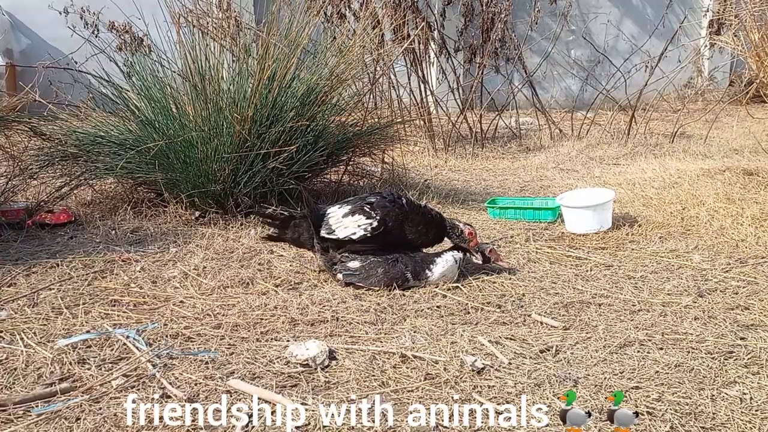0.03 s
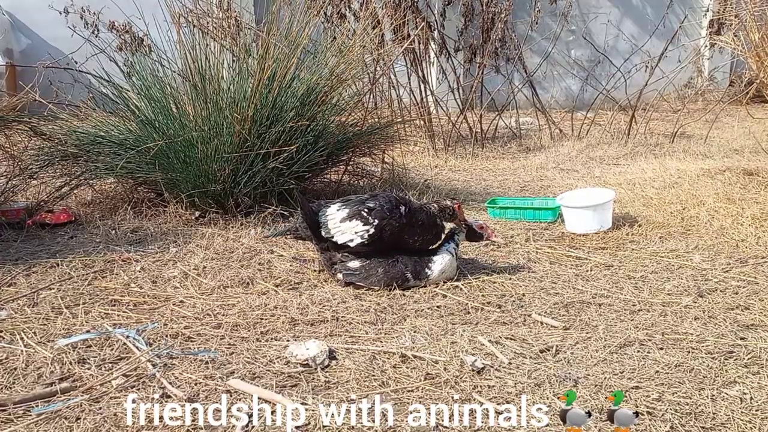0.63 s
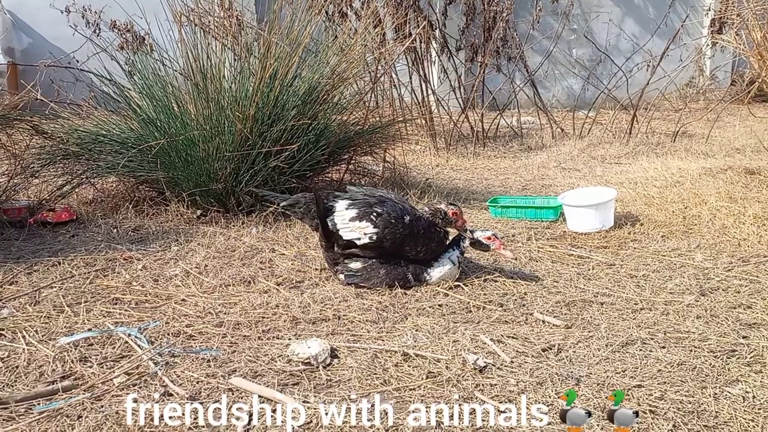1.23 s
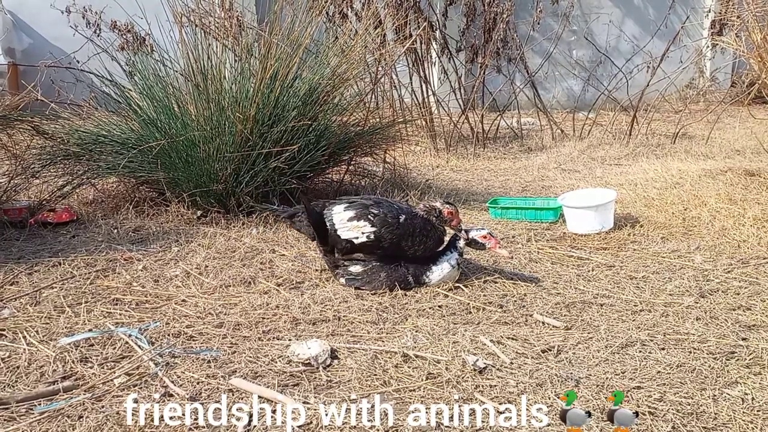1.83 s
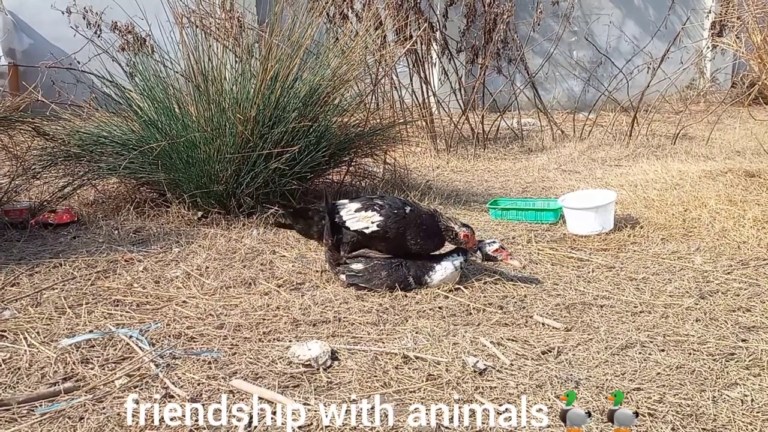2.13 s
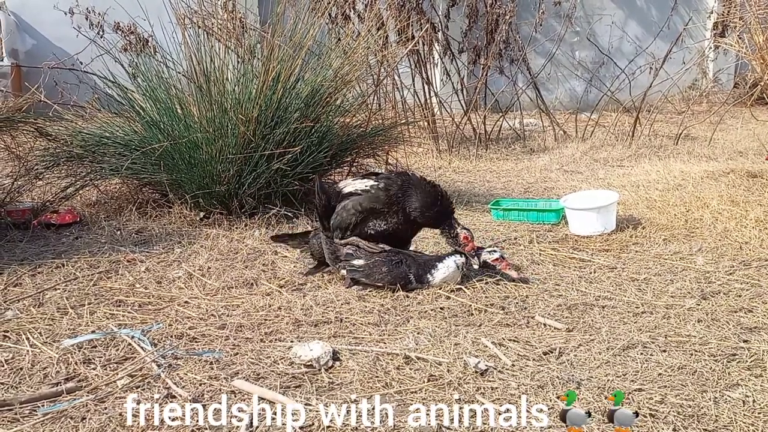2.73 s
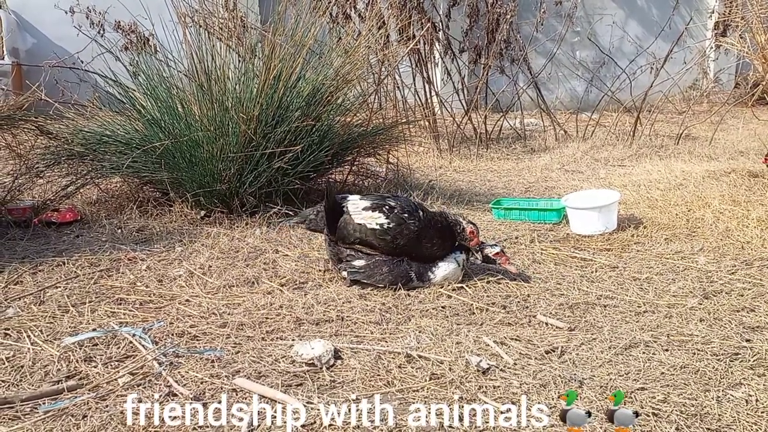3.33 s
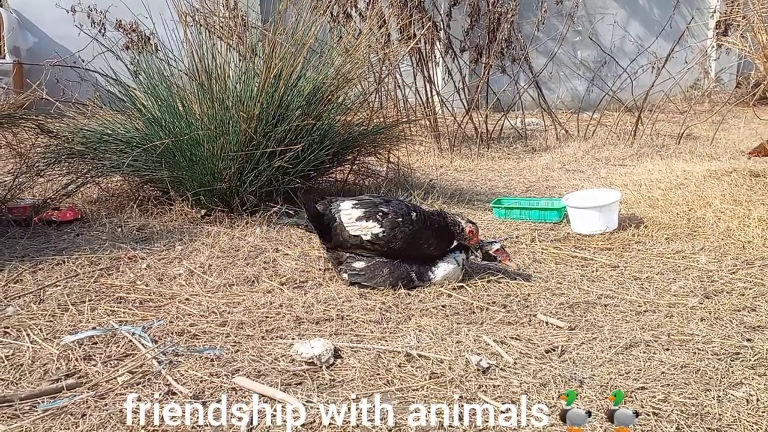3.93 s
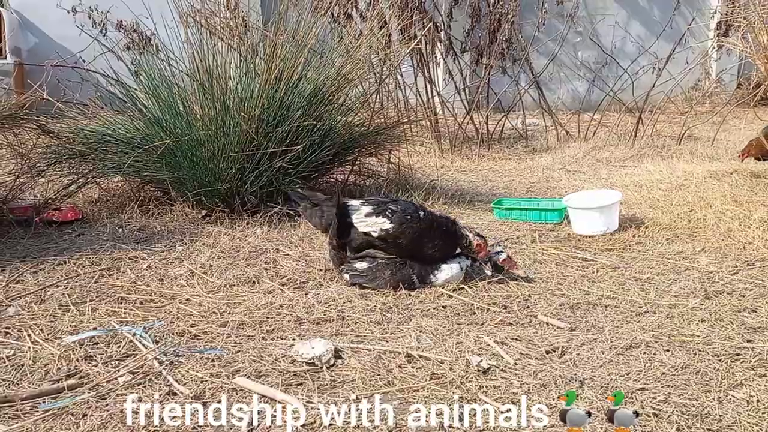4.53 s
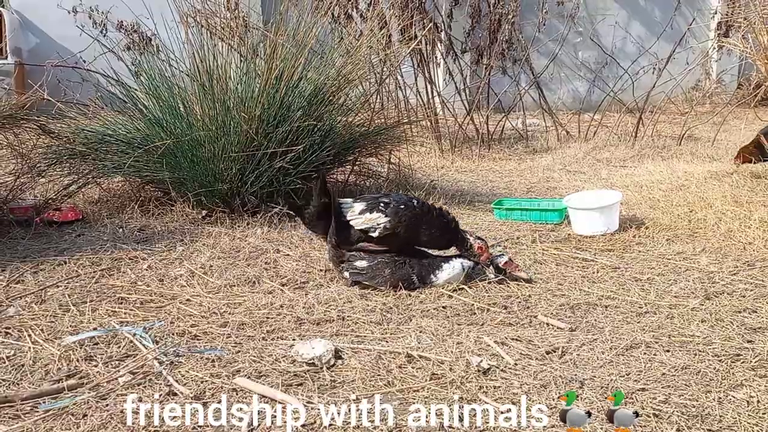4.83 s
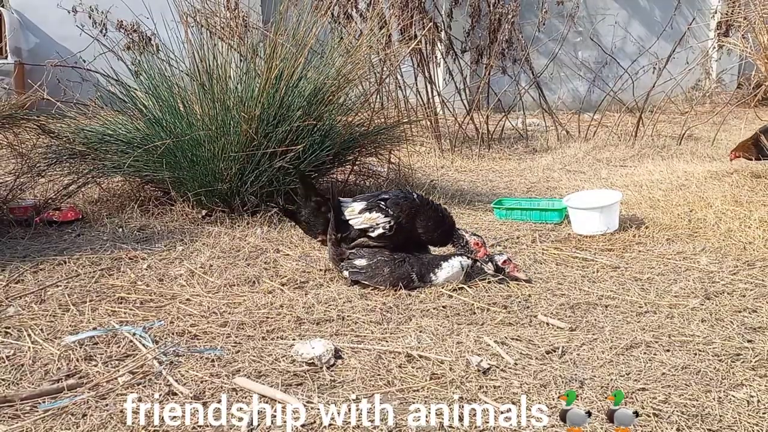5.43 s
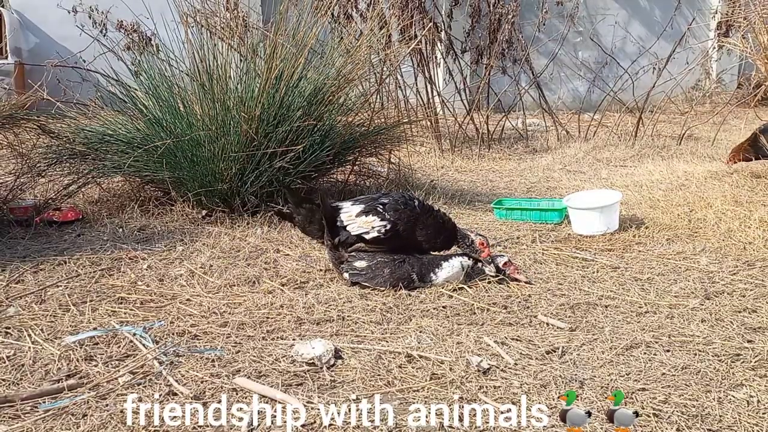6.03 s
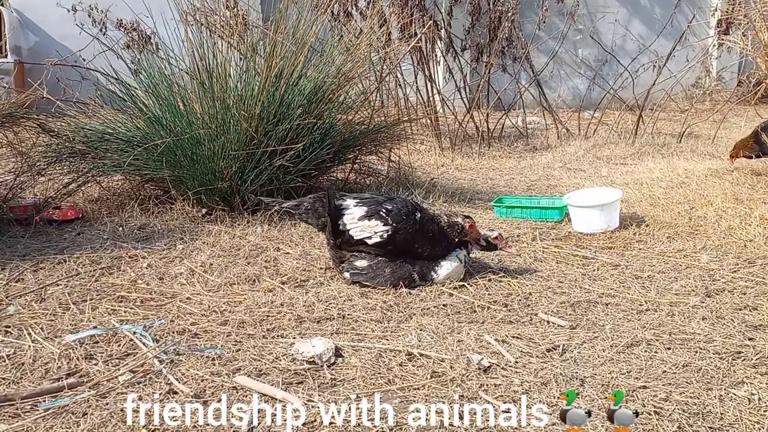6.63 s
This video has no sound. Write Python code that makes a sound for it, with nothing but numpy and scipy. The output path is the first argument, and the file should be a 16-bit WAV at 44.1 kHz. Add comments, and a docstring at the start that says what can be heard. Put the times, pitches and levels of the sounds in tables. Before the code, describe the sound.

A duck hisses in quick breathy pulses outdoors, with three hollow ringing knocks, one hen cluck and a low wind rumble.

```python
"""A drake hisses in quick pulses that then fade, air rushing through his throat, as two ducks scuffle
and wheeze on dry straw in a walled yard. Off to the right a hollow drum is knocked three times and its
shell rings; a hen gives one rasping cluck that the walls throw back. A low outdoor rumble with light
gusts and distant noise lies under it all, and puffs of air bump the left microphone."""
import sys
import numpy as np
from scipy import signal
from scipy.fft import rfft, irfft
from scipy.io import wavfile
from scipy.ndimage import uniform_filter1d

SR = 44100
rng = np.random.default_rng(int(sys.argv[2]) if len(sys.argv) > 2 else 0)


def log_audio(samples):
    """Write samples as a 16-bit WAV file to the path given in sys.argv[1]."""
    # one column per channel
    frames = np.atleast_2d(samples).T
    # limit to full scale, then quantise
    limited = np.clip(frames, -1, 1)
    pcm = np.round(limited * 32767).astype(np.int16)
    wavfile.write(sys.argv[1], SR, pcm)


N = 294588


def amp(db):
    """Decibels to gain."""
    return 10 ** (np.asarray(db) / 20)


def unit(x):
    """Scales to rms 1."""
    return x / np.sqrt(np.mean(x ** 2) + 1e-20)


def read(points, hz):
    """Reads (Hz, value) points on a log-frequency axis."""
    f, value = np.transpose(points)
    return np.interp(np.log(hz + 1), np.log(f + 1), value)


def colour(x, points):
    """Filters x by (Hz, dB) points, then scales to rms 1."""
    n = x.shape[-1]
    return unit(irfft(rfft(x) * amp(read(points, np.fft.rfftfreq(n, 1 / SR))), n))


def pan(side_db):
    """Constant-power stereo gains; positive is left."""
    return unit(amp(np.array([[side_db / 2], [-side_db / 2]])))


def add(mix, start_s, sound):
    """Adds a sound into the mix."""
    part = mix[..., max(round(start_s * SR), 0):][..., :sound.shape[-1]]
    part += sound[..., :part.shape[-1]]


def wander(window, size=N):
    """Noise averaged over window samples, at rms 1."""
    return unit(uniform_filter1d(rng.standard_normal(size), size=window))


def resonate(x, hz, width_hz):
    """Unity-gain resonance that follows hz."""
    carrier = np.exp(2j * np.pi * np.cumsum(hz * np.ones(x.shape[-1])) / SR)
    r = np.exp(-np.pi * abs(width_hz) / SR)
    return 2 * (carrier * signal.lfilter([(1 - r) ** 2], [1, -2 * r, r * r], x / carrier + 1e-18)).real


def diffuse(size):
    """White noise as two microphones hear a diffuse field."""
    # (frequency [Hz], left-right correlation [-1..1])
    coherence = [(60, 0.99), (130, 0.97), (290, 0.86), (640, 0.39), (1410, -0.22), (3100, -0.13),
                 (6820, 0.66), (15000, 1)]
    a, b = rfft(rng.standard_normal((2, size)))
    same = np.clip(read(coherence, np.fft.rfftfreq(size, 1 / SR)), -1, 1)
    return irfft(np.array([a, same * a + np.sqrt(1 - same ** 2) * b]), size)


def yard(x):
    """Scatter from walls and plants: a tail that dies faster in the treble."""
    # (frequency [Hz], T60 [s])
    decay_times = [(150, 1), (700, 0.97), (1800, 0.6), (4000, 0.46), (12000, 0.28)]
    hz, t, spectra = signal.stft(diffuse(SR), SR, nperseg=256)
    envelope = amp(-60 * t / read(decay_times, hz)[:, None]) * (1 - np.exp(-t / 0.0028))
    tail = signal.istft(spectra * envelope, SR, nperseg=256)[1]
    return signal.fftconvolve(np.atleast_2d(x), tail / np.linalg.norm(tail[0]), axes=1)[:, :N]


def outdoor_air():
    """A drifting rumble that slowly eases, under a thin steady hiss."""
    # (frequency [Hz], gain [dB])
    air_spectrum = [(15, -84), (25, -62), (56, -11.5), (87, -1.5), (145, -3), (166, -9), (354, -16.5),
                    (754, -37.5), (1400, -32), (1840, -31.5), (3080, -52), (3920, -52), (6920, -52.5),
                    (9320, -45.5), (16000, -49)]
    fall_db_per_s, drift_db = 0.38, 1.7
    t = np.arange(N) / SR
    air = amp(-54) * colour(diffuse(N), air_spectrum)
    low = signal.sosfiltfilt(signal.butter(2, 450, fs=SR, output="sos"), air)
    rumble = low * amp(-0.5 - fall_db_per_s * t + drift_db * wander(6000))
    return rumble * pan(1.8) + amp(-1) * (air - low)


def far_wash():
    """A wavering distant wash on the right sinks to a lull, then grows."""
    # (frequency [Hz], gain [dB])
    wash_spectrum = [(300, -0.5), (600, -12.5), (900, -13), (1300, -9), (1700, 2), (1950, 4.5), (2350, -9),
                     (2900, -18.5), (3500, -26.5), (4500, -23), (6000, -36.5)]
    lull_s, lull_db, fall_db_per_s, rise_db_per_s = 4.18, -70, 1.33, 3
    t = np.arange(N) / SR
    level_db = lull_db + np.maximum(fall_db_per_s * (lull_s - t), rise_db_per_s * (t - lull_s))
    return amp(level_db + 1.5 * wander(3000)) * colour(diffuse(N), wash_spectrum) * pan(-16)


def drake():
    """Air rushes through the throat; as the beak opens, resonances climb and the throat whistles."""
    # (start [s], length [s], level [dB])
    hisses = [(-.02, 0.098, -47), (0.227, 0.13, -48), (0.461, 0.1, -47.5), (0.712, 0.12, -48),
              (0.951, 0.12, -49.5), (1.185, 0.12, -49.5), (1.409, 0.13, -50.5), (1.718, .12, -50.5),
              (1.975, 0.066, -75), (3.02, 0.074, -74)]
    # throat resonances: (frequency [Hz], width [Hz], gain [dB])
    formants = [(1526, 270, -0.5), (2030, 650, 6), (2830, 610, 5.5), (3210, 180, -8)]
    attack_s, release_s, upper_db, whistle_db = 0.029, 0.024, -18.5, -14
    t = np.arange(N) / SR
    flow, upper_gain, whistle_gain, opening = np.zeros((4, N))
    for start_s, length_s, db in hisses:
        age_s = t - start_s
        push = np.clip(age_s / attack_s, 0, 1)
        push *= np.exp(-np.maximum(age_s - 0.76 * length_s, 0) / release_s)
        beak = np.exp(-((age_s / length_s - 0.85) / 0.36) ** 2)  # widest late in the hiss
        flow += amp(db) * push
        upper_gain += amp(db + upper_db) * np.sqrt(beak * push)
        whistle_gain += amp(db + whistle_db) * beak ** 2
        opening += beak
    stretch = 0.9645 + 0.05 * opening
    flutter = amp(2 * wander(180))  # the airway trembles
    throat = sum(amp(db) / np.sqrt(width_hz) * resonate(diffuse(N), hz * stretch, width_hz)
                 for hz, width_hz, db in formants)
    throat = colour(throat, [(600, -24), (1050, -2), (1350, 0.5), (3250, 1), (3700, -8.5), (6000, -5)])
    upper = resonate(diffuse(N), 3200 + 750 * opening, width_hz=700)
    upper = colour(upper, [(4100, -4.5), (4600, -2.5), (7000, 6)])
    whistle = unit(resonate(diffuse(N), hz=2790, width_hz=330))
    hiss = (flow * throat + upper_gain * upper + whistle_gain * whistle) * flutter * pan(-3.5)
    return amp(-1) * hiss + amp(-4) * yard(hiss)


def puffs():
    """Small eddies push the microphone in brief low pulses."""
    # (centre [s], level [dB], frequency [Hz], half length [s], left-right [dB])
    eddies = [(0.235, -28.5, 102, 0.0097, 32), (0.306, -39.5, 80, 0.078, 28),
              (0.353, -21.5, 98.4, 0.0054, 32), (0.422, -45.5, 90, 0.047, 14), (2.516, -48, 92, 0.019, 14),
              (2.93, -41.5, 94, 0.011, 12)]
    t, out = np.arange(N) / SR, np.zeros((2, N))
    for centre_s, db, hz, half_s, side_db in eddies:
        envelope = amp(db) * np.exp(-((t - centre_s) / half_s) ** 2)
        out += pan(side_db) * envelope * np.sin(2 * np.pi * hz * (centre_s - t))
    return out


def drum():
    """Each knock: a slap of the struck panel, a crack, a thud and the ringing modes of the shell."""
    # (time [s], ring [dB], place [0 wall..1 rim], slap [dB], slap [Hz], crack [dB], thud [dB])
    knocks = [(0.4994, 0.5, 0.03, -22, 1470, -37, -35), (5.8653, -0.5, 0.94, -9.5, 1692, -45.5, -43.5),
              (6.609, -6.5, 0.37, -19.5, 1610, -39.5, -35.5)]
    # (frequency [Hz], T60 [s], struck on wall [dB], struck on rim [dB], left-right [dB])
    modes = [(128, 0.6, -37, -50, 0), (279, 0.8, -37, -59, 3), (400, 0.85, -43, -65, 4),
             (503, 0.6, -44, -54, 8), (518, 0.62, -42, -49, 7), (611, 0.55, -35, -48, 3),
             (651, 0.48, -26, -40, 2), (722, 0.45, -48, -64, 14), (872, 0.7, -53, -61, -3),
             (1108, 0.33, -37.5, -41, -7), (1141, 0.52, -35.5, -43, -2), (1350, 0.75, -42, -47, -12),
             (1447, 0.33, -35, -60, -8), (1538, 0.58, -36, -34, -14), (1616, 0.32, -37, -33, -13),
             (1655, 0.24, -44, -34, -24), (1684, 0.33, -52, -31, -9), (1714, 0.24, -31, -28, -20),
             (1743, 0.28, -40, -35, -27), (1784, 0.24, -39, -32, -19), (1873, 0.7, -41, -41, -11),
             (1959, 0.5, -44, -39, -13), (2035, 0.5, -47, -50, -10), (2190, 0.44, -63, -48, -9),
             (2288, 0.3, -46, -62, -14), (2422, 0.35, -51, -46, -10), (2713, 0.35, -56, -52, -1),
             (2860, 0.45, -63, -59, -6)]
    # off things nearby: (delay [s], gain [dB])
    slap_echoes = [(.0045, -11), (.008, -6), (.011, -21), (0.021, -12.5), (.027, -21), (.0365, -13),
                   (.045, -20)]
    # (frequency [Hz], gain [dB])
    crack_spectrum = [(800, -22), (1500, 15.5), (2600, 7.5), (3400, -0.5), (4700, 4), (6500, -5.5),
                      (11000, -6), (16000, -18)]
    # (frequency [Hz], gain [dB])
    thud_spectrum = [(60, -43), (130, -2), (400, 7.5), (650, 1.5), (850, -5.5), (1150, 4), (2000, -36),
                     (4000, -58)]
    contact_s = 0.0042
    t = np.arange(SR) / SR
    contact = np.sin(np.pi * np.minimum(t / contact_s, 1))
    rings, slaps, blows = np.zeros((3, 2, N))
    for start_s, ring_db, place, slap_db, slap_hz, crack_db, thud_db in knocks:
        for hz, t60_s, wall_db, rim_db, side_db in modes:
            phase = rng.random() + 0.33 * rng.random((2, 1))  # out of step at the two microphones
            mode_db = ring_db + wall_db + place * (rim_db - wall_db)
            envelope = amp(mode_db - 60 * t / t60_s) * (1 - np.exp(-t / 0.0018))
            add(rings, start_s, pan(side_db) * envelope * np.sin(2 * np.pi * (hz * t + phase)))
        slap = amp(slap_db) * contact * np.sin(2 * np.pi * slap_hz * t) * pan(-29)
        for delay_s, echo_db in [(0.00079, 0.005)] + slap_echoes:
            add(slaps, start_s + delay_s, amp(echo_db) * slap)
        crack = amp(crack_db) * colour(diffuse(SR) + 0.66 * rng.standard_normal((2, SR)), crack_spectrum)
        crack *= np.exp(-t / 0.01) + 0.25 * np.exp(-t / 0.066)
        thud = amp(thud_db) * colour(diffuse(SR), thud_spectrum)
        thud *= np.exp(-t / 0.022) * (1 - np.exp(-t / 0.0021))
        add(blows, start_s, crack * pan(-1.2) + thud * pan(1.1))
    return rings + slaps + blows + amp(-4.5) * yard(blows) + amp(-17) * yard(slaps)


def gusts():
    """Low turbulence swells and dies away."""
    # (centre [s], half length [s], level [dB], frequency [Hz], left-right [dB])
    swells = [(0.626, 0.23, -57.5, 80, 6), (2.595, 0.14, -51, 100, 11), (4.68, 0.073, -51, 88, 2),
              (5.331, 0.13, -52, 56, -1), (5.967, .07, -55, 70.4, 2)]
    t, out, air = np.arange(N) / SR, np.zeros((2, N)), diffuse(N)
    for centre_s, half_s, db, hz, side_db in swells:
        envelope = amp(db) * np.exp(-((t - centre_s) / half_s) ** 2)
        out += pan(side_db) * envelope * unit(resonate(air, hz, width_hz=57))
    return out


def straw():
    """Dry stalks crackle underfoot in short clumps; feathers brush more softly."""
    # (start [s], length [s], level [dB], softness [0 crisp..1 brushing])
    rustles = [(1.363, 0.091, -80, 0), (1.424, 0.096, -72, 0.12), (1.624, .05, -79, 0.12),
               (1.896, 0.25, -86.5, 0.61), (2.56, 0.19, -85, 0.31), (2.895, 0.011, -77, 0.24),
               (3.195, 0.19, -81, 1), (3.332, 0.044, -73.5, 0.14), (3.377, 0.22, -89.5, 1),
               (4.188, 0.036, -84, 0.15), (4.746, .018, -74, 0.24), (5.195, 0.11, -89, 0.48),
               (5.727, 0.071, -76, 0), (6.152, 0.68, -84, 0.68), (6.335, 0.0075, -66.5, 0.77),
               (6.424, 0.011, -70.5, 0.89)]
    # (frequency [Hz], gain [dB])
    stalk_spectrum = [(2000, -20), (4500, -12), (6500, -25), (8200, 7.5), (9500, 3), (11500, 1),
                      (13500, -4), (16000, -11)]
    # (frequency [Hz], gain [dB])
    feather_spectrum = [(2000, -6), (3600, -7.5), (4400, -3), (5100, -5), (6200, -19), (9000, -19),
                        (16000, -26)]
    grains_per_s = 5000
    out = np.zeros((2, N))
    for start_s, length_s, db, softness in rustles:
        n = int(length_s * SR)
        grains = amp(3.4 * np.minimum(rng.exponential(1, n), 4)) * (rng.random(n) < grains_per_s / SR)
        crackle = np.sqrt(1 - softness) * colour(diffuse(n) * grains, stalk_spectrum)
        brush = np.sqrt(softness) * colour(diffuse(n), feather_spectrum)
        add(out, start_s, amp(db) * unit((crackle + brush) * np.hanning(n)))
    return out + amp(0.5) * yard(out)


def wheezes():
    """Air through a narrow throat: faint, trembling, fuzzy whistles that mostly slide down."""
    # (start [s], length [s], level [dB], from [Hz], to [Hz], width [Hz])
    peeps = [(1.542, 0.13, -63.5, 2720, 2760, 200), (1.997, 0.074, -68, 2590, 2220, 696),
             (2.178, 0.12, -78.5, 3270, 2620, 400), (2.264, .12, -73.5, 2440, 2050, 500),
             (2.576, .09, -69.5, 3250, 2700, 500), (2.61, 0.12, -68.5, 2650, 2100, 700),
             (2.907, 0.089, -83.5, 3900, 2950, 600), (2.998, 0.11, -74.5, 2670, 2100, 700),
             (5.02, 0.14, -77, 2430, 2620, 300), (5.194, 0.23, -76.5, 2930, 2780, 250),
             (5.671, .17, -77, 2670, 2680, 300), (6.036, 0.11, -67, 2580, 2600, 300)]
    out = np.zeros((2, N))
    air = diffuse(N) * amp(3 * wander(400))
    for start_s, length_s, db, from_hz, to_hz, width_hz in peeps:
        progress = np.linspace(0, 1, int(length_s * SR))
        breath = air[:, int(start_s * SR):][:, :len(progress)]
        whistle = unit(resonate(breath, from_hz + (to_hz - from_hz) * progress, width_hz))
        add(out, start_s, amp(db) * np.sin(np.pi * progress) * whistle * pan(-6.5))
    return out + amp(-4.5) * yard(out)


def far_swell():
    """A dull distant noise sets in with a surge, settles, then keeps growing."""
    # (frequency [Hz], gain [dB])
    swell_spectrum = [(30, -16), (50, -8.5), (75, 4), (130, -9), (400, -12), (750, -16.5), (1500, -21),
                      (2100, -29), (3000, -38), (6000, -62)]
    start_s, rise_s, growth_db_per_s, surge_fade_s = 4.58, 0.11, 2.2, 0.22
    age_s = np.maximum(np.arange(N) / SR - start_s, 0)
    surge_db = 11.5 * np.exp(-(age_s / surge_fade_s) ** 2)
    envelope = np.minimum(age_s / rise_s, 1) * amp(-64 + growth_db_per_s * age_s + surge_db)
    return envelope * colour(diffuse(N), swell_spectrum) * pan(-1)


def hen():
    """One cluck on an arch of pitch; midway, alternate pulses grow unequal and rasp at half pitch."""
    # (frequency [Hz], gain [dB])
    throat_spectrum = [(300, -23.5), (520, 1.5), (690, 3.5), (1000, -20), (1350, -6), (1750, 6),
                       (2020, 4.5), (2600, -17), (3300, -22.5), (5000, -33), (8000, -51)]
    # (delay [s], gain [dB], extra treble gain [dB])
    wall_echoes = [(.036, -11, -6), (.058, -13.5, 0.5), (.098, -4, -33)]
    start_s, length_s, attack_s, release_s, sag_db_per_s = 4.589, 0.066, 0.029, 0.006, 85
    low_hz, top_hz, top_s, arch_s = 596, 704, 0.054, 0.0299
    break_s, break_width_s = 0.042, 0.0027
    t = np.arange(0, 2 * length_s, 1 / SR)
    push = np.minimum(t / attack_s, 1) * np.exp(-np.maximum(t - length_s, 0) / release_s)
    envelope = push * amp(-40.5 - sag_db_per_s * (t - attack_s))
    pitch_hz = low_hz + (top_hz - low_hz) * np.exp(-((t - top_s) / arch_s) ** 2)
    jitter = 1 + 0.026 * wander(60, len(t))
    phase = 2 * np.pi * np.cumsum(pitch_hz * jitter) / SR
    rasp = 0.94 * (1 + np.tanh((t - break_s) / break_width_s)) / 2
    pulses = sum(np.cos(k * phase) + rasp * np.cos((k - 0.5) * phase) for k in range(1, 11))
    breath = 1.16 * rng.standard_normal(len(t))
    voice = envelope * colour(unit(pulses) + breath, throat_spectrum)
    low, high = (signal.sosfilt(signal.butter(4, 950, kind, fs=SR, output="sos"), voice)
                 for kind in ("low", "high"))
    out = np.zeros((2, N))
    for delay_s, echo_db, treble_db in [(0.0024, 0, 0)] + wall_echoes:
        add(out, start_s + delay_s, amp(echo_db) * (low * pan(9.4) + amp(treble_db) * high * pan(-12.5)))
    return out + amp(-17) * yard(out)


def scene():
    """Birds, drum and straw over wind and distant noise."""
    events = drake() + wheezes() + drum() + hen() + straw()
    return events + puffs() + gusts() + outdoor_air() + far_wash() + far_swell()


def record(dry):
    """The microphone's bass cut and the recorder's band limit."""
    bass_cut_hz, band_limit_hz = 44, 15800
    lean = signal.sosfilt(signal.butter(6, bass_cut_hz, "high", fs=SR, output="sos"), dry)
    taps = signal.firwin(511, band_limit_hz, window=("kaiser", 9), fs=SR)
    return signal.oaconvolve(lean, taps[None], "same")


dry = scene()
out = record(dry)
log_audio(out)
```